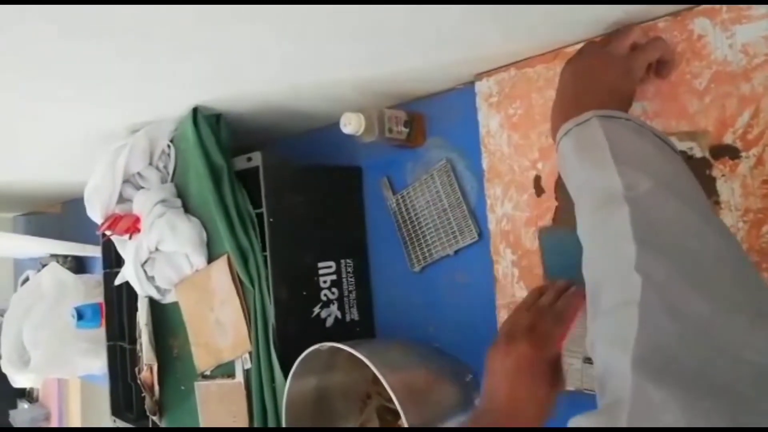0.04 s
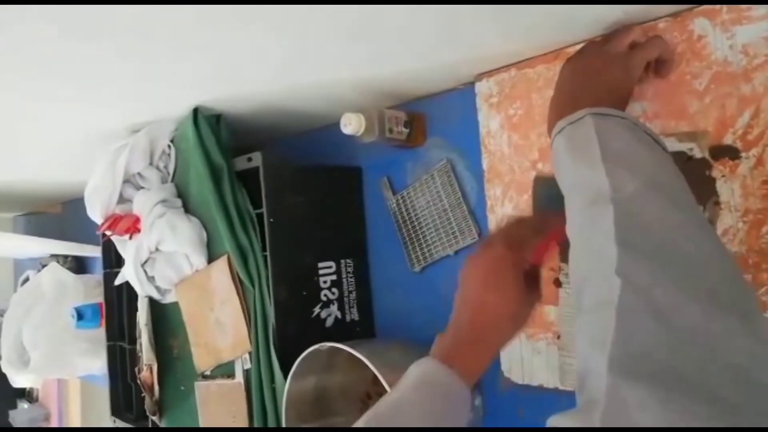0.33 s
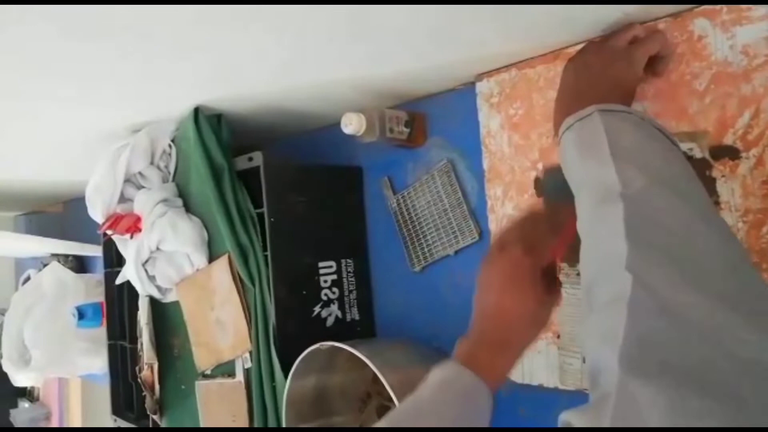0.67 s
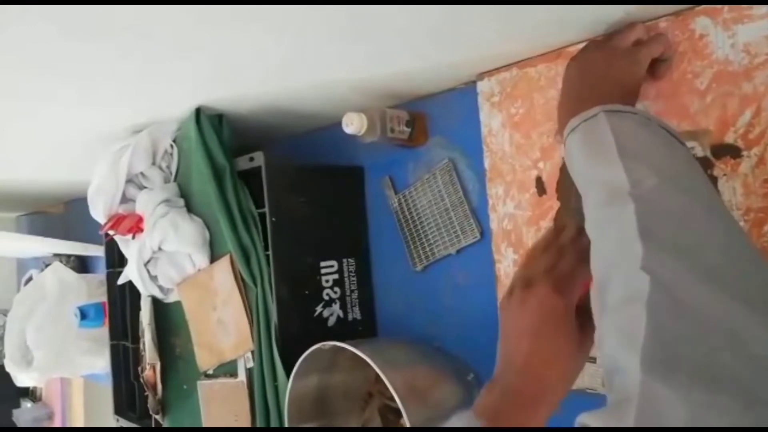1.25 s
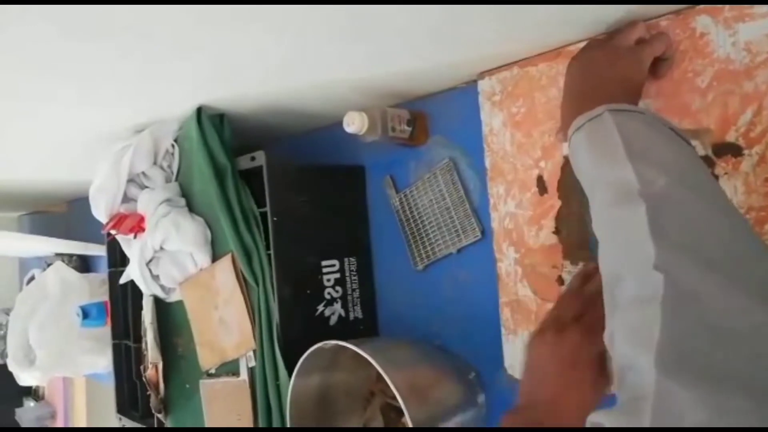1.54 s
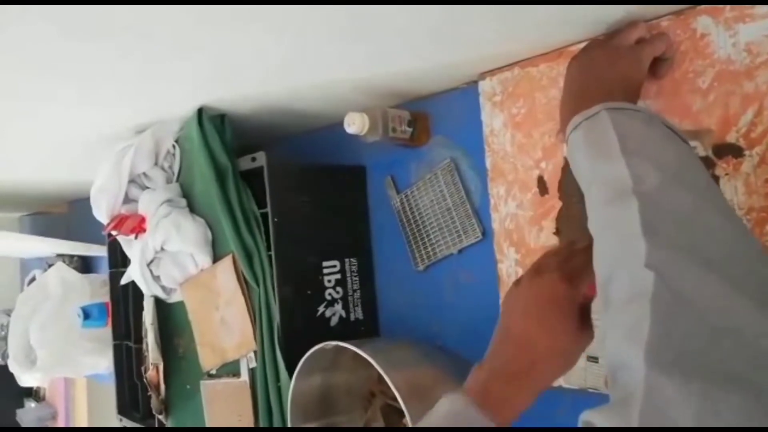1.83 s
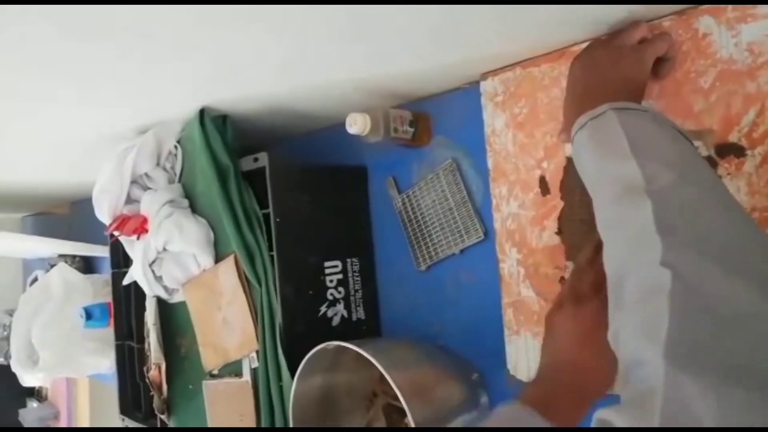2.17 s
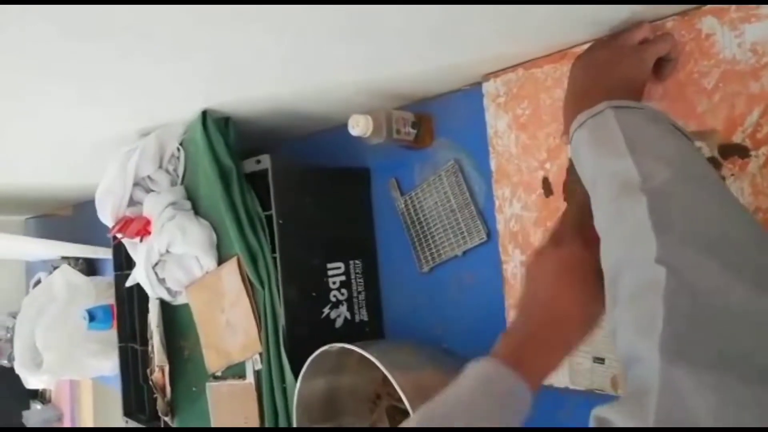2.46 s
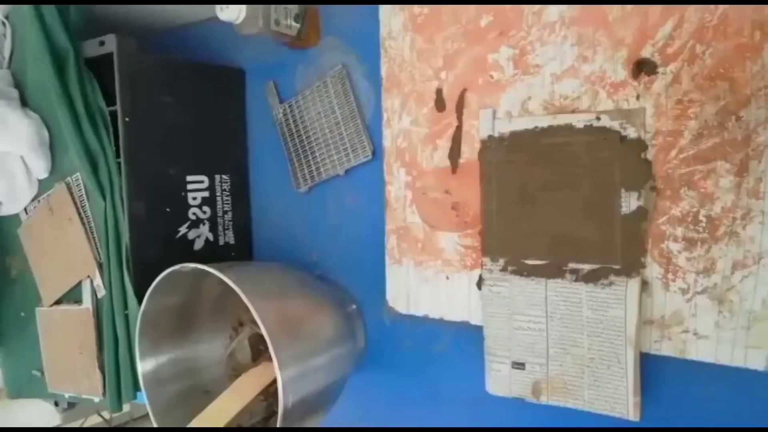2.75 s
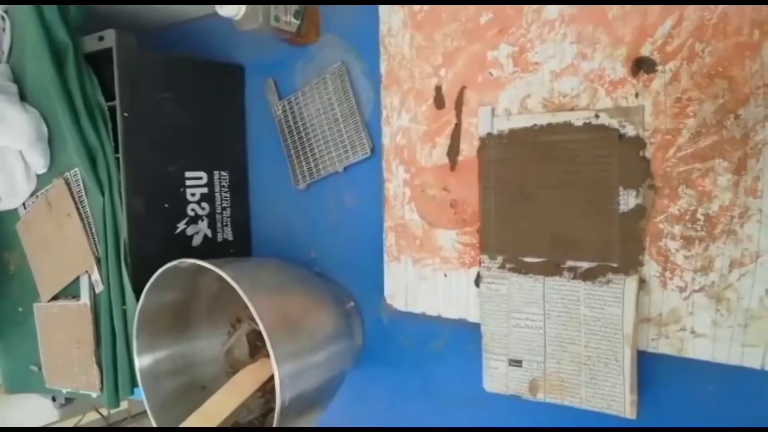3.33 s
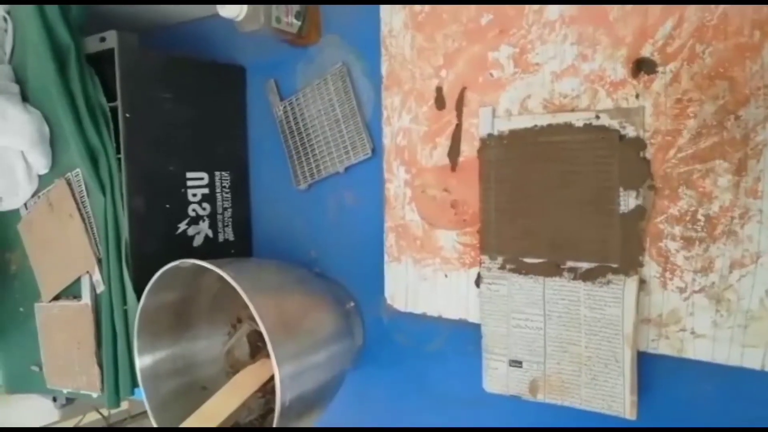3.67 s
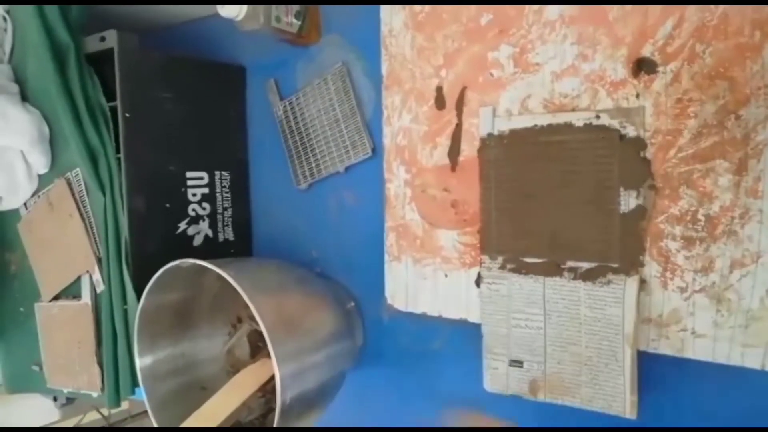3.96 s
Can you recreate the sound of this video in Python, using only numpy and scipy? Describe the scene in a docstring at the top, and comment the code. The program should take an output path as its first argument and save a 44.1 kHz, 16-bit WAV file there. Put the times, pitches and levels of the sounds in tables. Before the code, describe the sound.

A scraper spreads gritty paste in four quick, hissing rasps during the first 1.3 seconds, close by indoors. The blade squeaks and rings faintly, and the board knocks dully under the first three strokes. Around 1.5 seconds come a soft wipe and tiny snaps. A low hum and dull rush then swell over a constant deep rumble, with faint sleeve rustling and light tool ticks from 3.4 to 3.8 seconds.

```python
"""A flat scraper spreads gritty paste over a grid plate on a board in four quick strokes, indoors.
Stick-slip friction on the grit hisses and rasps; the blade's resonance sinks as it bends, and plate
and blade ring on. The edge squeaks, grit snaps, the board knocks and the paste is softly wiped.
Then a low hum and a dull rush swell over a deep rumble, a sleeve rustles as the arms draw back,
and the tool ticks as it is taken away."""
import sys
import numpy as np
from scipy import signal
from scipy.fft import rfft, irfft
from scipy.io import wavfile
from scipy.ndimage import uniform_filter1d, minimum_filter1d, map_coordinates

SR = 44100
rng = np.random.default_rng(int(sys.argv[2]) if len(sys.argv) > 2 else 0)


def wav_out(sig):
    """Save sig, one row per channel (or a flat mono array), as 16-bit PCM at SR to the path in sys.argv[1]."""
    wavfile.write(sys.argv[1], SR, np.round(np.clip(np.atleast_2d(sig).T, -1, 1) * 32767).astype(np.int16))


N = 176400
T = np.arange(N) / SR

# spectrum of grit under the edge: f/Hz, relative level/dB
GRIT_SPECTRUM = [(1500, -32), (2500, -7), (3500, -13), (4400, -7), (5800, -8.5), (7800, -3.5), (8900, 5),
                 (12700, -1.5), (14500, -9), (16000, -28)]
# envelopes of the low background: t/s, rumble level/dB, drone level/dB
LOW_ENVELOPES = [(0, -32, -28), (.12, -17.5, -21.5), (.29, -34, -25.5), (.41, -16.5, -28), (.525, -22, -25),
                 (.56, -36, -37.5), (.8, -25, -29), (1.03, -30.5, -28.5), (1.14, -24.5, -22.5),
                 (1.38, -23.5, -30), (1.55, -30, -23.5), (2.08, -22, -15.5), (2.25, -16.5, -21.5),
                 (3.15, -23, -21), (3.9, -15, -20.5)]


def scrape():
    """Stick-slip friction: in each push the edge hisses over grit and rasps through blade and board."""
    # rasp of blade and board: f/Hz, relative level/dB
    rasp_spectrum = [(100, -7), (380, 6), (600, -17.5), (1080, -5.5), (1400, -3.5), (2300, 1.5), (3300, -7),
                     (5800, -3.5), (12000, -45)]
    # pushes, in four strokes and a light last wipe: start t/s, duration/s, hiss level/dB, rasp level/dB
    pushes = [(.0362, 0.0064, -16, -17), (0.068, 0.028, -20, -21.5), (0.095, 0.04, -10.5, -18.5),
              (0.134, .066, -16, -16.5), (0.398, 0.0098, -25.5, -30.5), (0.515, 0.025, -15, -33),
              (0.533, 0.018, -4.5, -14), (.549, 0.068, -26.5, -26), (0.565, 0.0088, -15.5, -24.5),
              (0.785, 0.02, -26, -30.5), (0.808, 0.032, -19.5, -27), (0.837, 0.021, -12.5, -22),
              (0.857, 0.02, -20.5, -29), (0.8817, 0.0058, -12, -21), (.891, 0.023, -15, -20),
              (0.902, 0.033, -24.5, -20), (1.112, 0.02, -22.5, -52), (1.196, 0.013, -23, -46),
              (1.2148, 0.014, -15, -28), (1.231, 0.026, -16.5, -31), (1.255, 0.013, -7.5, -23),
              (1.259, 0.047, -19.5, -22), (1.437, .007, -25, -28)]
    slips = unit(amp(2.5 * wander(hz=200)))
    hiss = amp(-2) * shifting_contact(colour(grit(per_s=33000, spread_db=3) * slips, GRIT_SPECTRUM))
    rasp = shifting_contact(colour(grit(per_s=33000, spread_db=3) * slips, rasp_spectrum))
    return sum(arch(start, length) * (amp(hiss_db) * hiss + amp(rasp_db) * rasp)
               for start, length, hiss_db, rasp_db in pushes)


def shifting_contact(x):
    """Time-varying filtering: the resonances of the contact shift at random as the edge moves."""
    patch_hz, patch_s, depth_db = 450, .007, 3.2
    hz, t, spectra = signal.stft(x, SR, nperseg=256, noverlap=192)
    field = rng.standard_normal((200, 1500))
    grid = np.meshgrid(hz / patch_hz, t / patch_s, indexing="ij")
    gain = amp(depth_db * unit(map_coordinates(field, grid, order=1, mode="wrap")))
    return unit(signal.istft(spectra * gain, SR, nperseg=256, noverlap=192)[1][:N])


def blade():
    """Resonance: the blade's whine sinks as it bends and rises on release; free vibration follows."""
    # deepest bend of each stroke: t/s, whine level/dB, ring level/dB
    bends = [(0.176, -14, -23.5), (0.576, -38, -36.5), (0.912, -23, -25), (1.279, -22, -37)]
    # modes of plate and blade: f/Hz, relative level/dB, T60/s
    ring_modes = [(1032, -8.5, 0.81), (2053, -1.5, 0.63), (2450, -10.5, 0.68), (4120, -9.5, 0.56)]
    bent_hz, relaxed_hz, bend_s = 1720, 2678, .021
    rings = [(amp(db) * resonance(hz, width_hz=140), t60) for hz, db, t60 in ring_modes]
    out = np.zeros(N)
    for at, whine_db, ring_db in bends:
        slack = np.minimum(((T - at) / bend_s) ** 2, 20)  # zero at the deepest bend
        pitch = np.interp(slack, [0, 2], [bent_hz, relaxed_hz])
        out += amp(whine_db) * np.exp(-slack) * resonance(pitch, width_hz=140)
        age = np.maximum(T - at, 0)
        out += (T > at) * sum(ring * amp(ring_db - 60 * age / t60) for ring, t60 in rings)
    return out


def squeaks():
    """Friction-excited vibration: the edge catches on the plate in a short, coarse, rising squeak."""
    # catches: start t/s, duration/s, centre f/Hz, level/dB
    catches = [(.787, 0.0095, 2000, -21.5), (.529, 0.0263, 4500, -16), (.824, 0.0284, 3000, -25.5)]
    out = np.zeros(N)
    for start, length, hz, db in catches:
        progress = np.clip((T - start) / length, 0, 1)
        pitch = hz * (1 + .14 * (progress - .5))
        out += amp(db) * arch(start, length) * resonance(pitch, width_hz=600)
    return out


def pops():
    """Impulsive excitation: grit and wet paste snap in bright noise that decays exponentially."""
    # snaps: t/s, level/dB
    snaps = [(0.084, -6), (1.4491, -13), (1.508, -14), (1.593, -8)]
    decay_s = .0011
    envelope = sum(amp(db) * (T > at) * np.exp(-np.clip((T - at) / decay_s, 0, 20)) for at, db in snaps)
    return envelope * colour(rng.standard_normal(N), GRIT_SPECTRUM)


def knocks():
    """Damped modes: the board booms briefly at two low frequencies when the blade is pressed down."""
    # presses on the board: t/s, level/dB, lower mode f/Hz
    presses = [(0.044, -6.5, 178.6), (0.497, -12.5, 154), (0.793, -2, 165)]
    rise_s, t60_s, overtone_ratio = .0037, .15, 1.45
    out = np.zeros(N)
    for at, db, hz in presses:
        age = np.maximum(T - at, 0)
        phase = 2 * np.pi * hz * age
        boom = np.sin(phase) + amp(-13) * np.sin(overtone_ratio * phase)
        out += amp(db - 60 * age / t60_s) * (1 - np.exp(-age / rise_s)) * boom
    return out


def wipes():
    """Wet friction: soft strokes over the paste swell and fade, each with its own hollow resonance."""
    # strokes: start t/s, duration/s, smear level/dB, resonance f/Hz, resonance level/dB
    strokes = [(1.428, 0.18, -32.5, 3500, -42.5), (3.189, 0.15, -42.5, 3480, -40.5),
               (3.633, 0.096, -35, 4370, -42.5)]
    # smeared paste: f/Hz, relative level/dB
    spectrum = [(2700, -9), (4250, -10), (5300, 10.5), (6100, -6), (9300, 4.5), (12700, 1.5), (15000, -14)]
    smear = colour(grit(per_s=12000, spread_db=2.5), spectrum)
    return sum(arch(start, length) * (amp(db) * smear + amp(hollow_db) * resonance(hz, width_hz=480))
               for start, length, db, hz, hollow_db in strokes)


def ticks():
    """Light impacts: brief contacts give broadband clicks as the tool is taken away."""
    # contacts: t/s, level/dB
    contacts = [(3.425, -31.5), (3.633, -26.5), (3.7603, -21), (3.802, -30)]
    # one click: f/Hz, relative level/dB
    spectrum = [(1500, -18), (3400, 12), (5000, 3), (6500, 5.5), (15000, -6)]
    envelope = sum(amp(db) * arch(at, length_s=.0051) for at, db in contacts)
    return envelope * colour(rng.standard_normal(N), spectrum)


def rubbing():
    """Friction noise: fine, soft grains of sleeve cloth and wet paste add up to a rustle."""
    # course of the rubbing: t/s, level/dB
    envelope = [(.39, -50), (.5, -30.5), (.62, -46), (.77, -49.5), (1.42, -62), (1.62, -33), (1.72, -50),
                (1.86, -43), (2.7, -54), (2.98, -42.5), (3.12, -50), (3.23, -34), (3.37, -45), (3.79, -37),
                (3.88, -29)]
    # rustle: f/Hz, relative level/dB
    spectrum = [(2000, 1), (3500, -4), (5500, -7), (7500, -5.5), (9200, 3), (11000, 2), (13400, -3.5),
                (16000, -22.5)]
    grains = grit(per_s=25000, spread_db=5.5) * amp(1.7 * wander(hz=70))
    return contour(envelope) * colour(grains, spectrum)


def hum():
    """Random modulation: one low tone wavers in frequency and amplitude as it swells and fades."""
    # swell of the hum: t/s, rms level/dB
    envelope = [(1.38, -37.5), (1.53, -13.5), (2.0, -21), (2.45, -11), (3.0, -9), (3.4, -10), (4, -19.5)]
    pitch_hz = 112.35 + 1.47 * wander(hz=5.3)
    waver_db = wander(hz=7.2)
    return np.sqrt(2) * contour(envelope) * amp(waver_db) * np.sin(2 * np.pi * np.cumsum(pitch_hz) / SR)


def rush():
    """Amplitude-modulated noise: a dull rush flutters as it swells."""
    # swell of the rush: t/s, level/dB
    envelope = [(.45, -33.5), (.65, -38), (1.38, -36), (1.5, -31.5), (2.05, -24.5), (2.42, -25.5),
                (2.62, -30.5), (3.1, -32.5), (3.85, -27), (4, -33)]
    # dull noise: f/Hz, relative level/dB
    spectrum = [(200, -2.5), (450, -1.5), (630, -8), (810, -2.6), (1330, -6), (1900, -1.5), (2200, -6.5),
                (2660, -19), (3720, -18.5), (7750, -34), (16000, -50)]
    fluttering = rng.standard_normal(N) * amp(1.52 * wander(hz=124))
    return contour(envelope) * colour(fluttering, spectrum)


def rumble():
    """Low-frequency noise: a deep rumble ducks after the loud second stroke, as under gain control."""
    # rumble: f/Hz, relative level/dB
    spectrum = [(10, -20), (25, -3), (40, 11), (58, 16), (120, 12), (200, -36), (1000, -95)]
    return contour(LOW_ENVELOPES, column=1) * colour(rng.standard_normal(N), spectrum)


def drone():
    """Band-limited noise: a broad peak near 115 Hz is heard as a low drone."""
    # drone: f/Hz, relative level/dB
    spectrum = [(70, -5.5), (115, 7), (170, 2.5), (240, -6), (400, -15), (560, -43), (2000, -95)]
    return amp(3.5) * contour(LOW_ENVELOPES, column=2) * colour(rng.standard_normal(N), spectrum)


def room(x):
    """Diffuse reverberation: the energy of each band lingers as noise and decays at its own rate."""
    # reverberation times: f/Hz, T60/s
    decay_times = [(200, 0.18), (1000, 0.78), (4500, 1), (15000, 0.25)]
    hz, t, spectra = signal.stft(x, SR, nperseg=256)
    decay = amp(-60 * t[t < 1] / on_log(decay_times, hz)[:, None]) ** 2
    power = uniform_filter1d(abs(spectra) ** 2, size=5, axis=0)
    lingering = signal.fftconvolve(power, decay / decay.sum(1).mean(), axes=1)[:, :len(t)]
    noise = signal.stft(rng.standard_normal(N), SR, nperseg=256)[2]
    tail = np.sqrt(abs(lingering)) * noise / noise.std()
    return amp(-14) * signal.istft(tail, SR, nperseg=256)[1][:N]


def grit(per_s, spread_db):
    """Shot noise: random clicks of uneven size, at rms 1."""
    size = amp(spread_db * np.minimum(rng.exponential(1, N), 5))
    return unit(size * rng.choice([-1., 1.], N) * (rng.random(N) < per_s / SR))


def resonance(hz, width_hz):
    """Narrow-band noise: a rough resonance of rms 1 that follows a pitch."""
    carrier = np.exp(2j * np.pi * np.cumsum(hz * np.ones(N)) / SR)
    return (carrier * (wander(width_hz) + 1j * wander(width_hz))).real


def arch(start_s, length_s):
    """Contact envelope: pressure swells and lets go in one rounded arch."""
    progress = np.clip((T - start_s) / length_s, 0, 1)
    return (4 * progress * (1 - progress)) ** .39


def wander(hz):
    """Low-pass noise: a random fluctuation of rms 1, up to about the given rate."""
    f = np.fft.rfftfreq(N, 1 / SR)
    return unit(irfft(rfft(rng.standard_normal(N)) / (1 + (f / hz) ** 4), N))


def colour(x, spectrum):
    """Spectral shaping: filters x by a table of levels, then scales to rms 1."""
    gain = amp(on_log(spectrum, np.fft.rfftfreq(N, 1 / SR)))
    return unit(irfft(rfft(x) * gain, N))


def contour(rows, column=1):
    """Gain over time, interpolated in decibels and held at its ends."""
    rows = np.array(rows)
    return amp(np.interp(T, rows[:, 0], rows[:, column]))


def on_log(points, hz):
    """Interpolation on a logarithmic frequency axis."""
    f, values = np.transpose(points)
    return np.interp(np.log(hz + 1), np.log(f + 1), values)


def amp(db):
    """Decibels to amplitude ratio."""
    return 10 ** (np.asarray(db) / 20)


def unit(x):
    """Normalisation to rms 1."""
    return x / np.sqrt(np.mean(x ** 2) + 1e-20)


def scene():
    """Superposition: the tool and its reverberation, with knocks, soft friction and the background."""
    tool = scrape() + blade() + squeaks() + pops() + ticks()
    work = tool + room(tool) + knocks() + rubbing() + wipes()
    return (work + rumble() + drone() + rush() + hum())[None]


def record(dry):
    """Peak limiting: the gain drops at each peak and recovers; a low-pass filter then limits the band."""
    ceiling, recovery_db_per_s, cutoff_hz = .76, 400, 15800
    over_db = 20 * np.log10(np.maximum(abs(dry[0]) / ceiling, 1))
    recovery_db = T * recovery_db_per_s
    cut_db = np.maximum.accumulate(over_db + recovery_db) - recovery_db
    gain = uniform_filter1d(minimum_filter1d(amp(-cut_db), size=65), size=65)
    lowpass = signal.firwin(255, cutoff_hz, window=("kaiser", 9), fs=SR)
    return signal.oaconvolve(dry * gain, lowpass[None], "same")


dry = scene()
out = record(dry)
wav_out(out)
```